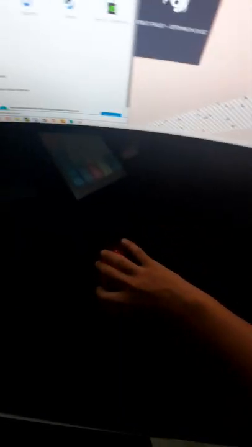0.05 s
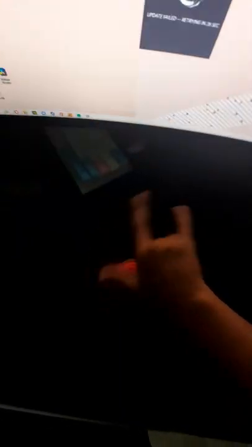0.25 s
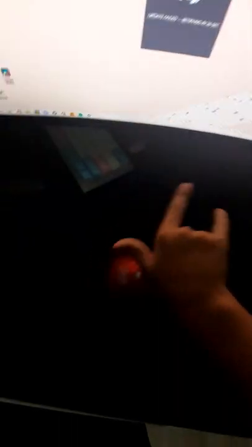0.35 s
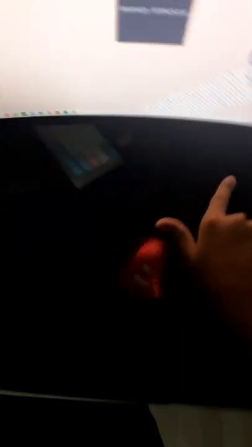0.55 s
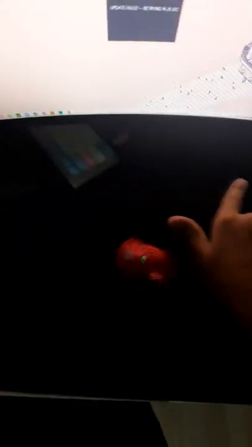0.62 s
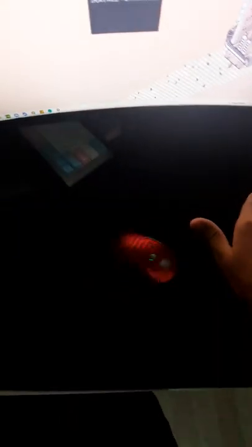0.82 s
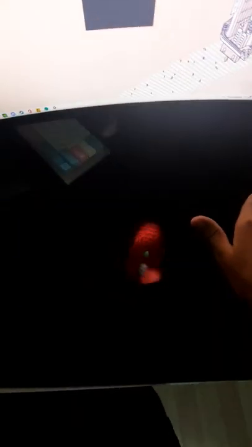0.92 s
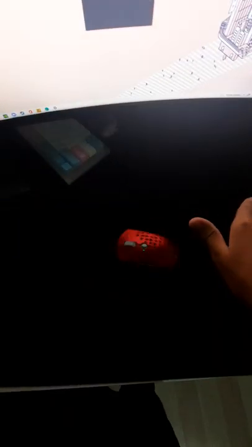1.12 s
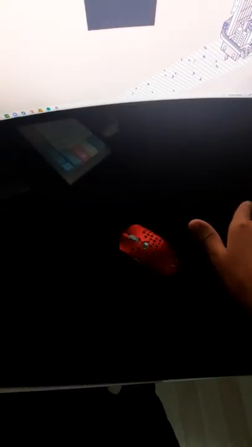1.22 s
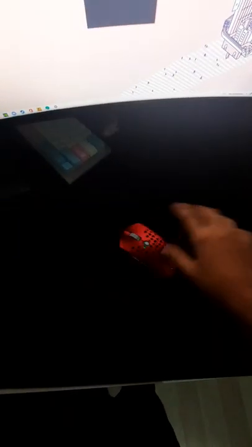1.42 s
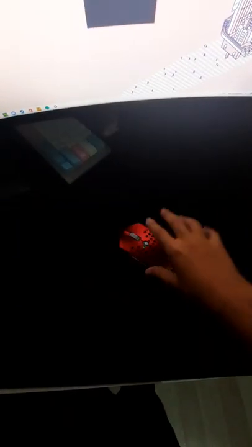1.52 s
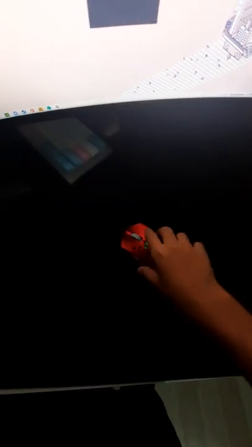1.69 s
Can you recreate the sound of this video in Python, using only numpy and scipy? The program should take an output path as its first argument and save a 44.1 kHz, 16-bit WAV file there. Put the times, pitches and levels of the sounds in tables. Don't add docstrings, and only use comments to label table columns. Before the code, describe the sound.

Computer mouse flicked on a desk: quick double click, one woody knock, small bounce, soft fading spin

```python
import sys
import numpy as np
from scipy import signal
from scipy.fft import rfft, irfft, next_fast_len
from scipy.io import wavfile
from scipy.ndimage import uniform_filter1d, map_coordinates

SR = 44100
rng = np.random.default_rng(int(sys.argv[2]) if len(sys.argv) > 2 else 0)


def level_to_linear(level):
    exponent = np.asarray(level, float) / 20
    return 10 ** exponent


def master_out(mix):
    frames = np.transpose(np.atleast_2d(mix))
    ceiling = np.clip(frames, -1, 1)
    pcm = np.round(ceiling * 32767).astype(np.int16)
    wavfile.write(sys.argv[1], SR, pcm)


N = 77175
TOP_HZ = 15780


def unit(x):
    return x / np.sqrt(np.mean(x ** 2) + 1e-20)


def along(points, hz):
    f, v = np.transpose(points)
    return np.interp(np.log(hz + 1), np.log(f + 1), v)


def curves(rows):
    s, *cols = np.transpose(rows)
    return [np.interp(np.arange(N) / SR, s, c, left=-140, right=-140) for c in cols]


def wobble(rate_hz):
    knots = rng.standard_normal(int(N * rate_hz / SR) + 4)
    return unit(map_coordinates(knots, [np.arange(N) * rate_hz / SR]))


def sides(left_over_right_db):
    return level_to_linear([[left_over_right_db / 2], [-left_over_right_db / 2]])


def filtered(x, response):
    m = next_fast_len(x.shape[-1] + 8192)
    return irfft(rfft(x, m) * response(np.fft.rfftfreq(m, 1 / SR)), m)[..., :x.shape[-1]]


def resonances(peaks):
    def response(f):
        total = 0
        for k, (hz, width_hz, db) in enumerate(peaks):
            damping = 1j * f * width_hz
            total = total + (-1) ** k * level_to_linear(db) * damping / (hz * hz - f * f + damping)
        return total
    return response


def rush(spectrum, alike, patchy_db, source=None):
    if source is None:
        source = rng.standard_normal((2, N))
    z = signal.stft(source, nperseg=512)[2]
    field = rng.standard_normal(z.shape[1:])
    field = uniform_filter1d(uniform_filter1d(field, size=6, axis=0), size=10, axis=1)
    pair = signal.istft(z * level_to_linear(patchy_db * unit(field)), nperseg=512)[1][:, :N]

    def mid_side(hz):
        turn = np.arccos(np.clip(along(alike, hz), -1, 1)) / 2
        return level_to_linear(along(spectrum, hz)) * (hz < TOP_HZ) * [np.cos(turn), np.sin(turn)]

    mid, side = filtered(pair, mid_side)
    return unit(np.array([mid + side, mid - side]))


# (hz, t60_s)
ROOM_DECAY = [(80, 0.42), (300, 0.26), (1000, 0.49), (3000, 0.25), (7000, 0.32), (14000, 0.12)]


def fading(x):
    hz, t, z = signal.stft(x, SR, nperseg=256)
    decay = level_to_linear(-60 * t / along(ROOM_DECAY, hz)[:, None])
    return signal.istft(z * decay, SR, nperseg=256)[1][:, :N]


# (hz, level_db_per_hz)
HUM = [(15, -61.5), (25, -8.5), (96, -6.5), (225, -12), (306, -6.5), (357, -14.5), (450, -4.5), (515, -7.5),
       (2500, -37), (3250, -68), (5500, -120)]
# (hz, width_hz, level_db)
STANDING = [(262, 25, -3.5), (352, 30, 5), (460, 7, 3), (553, 22, -3)]
# (hz, left_right_likeness)
HUM_ALIKE = [(60, 0.19), (240, 0.96), (950, -0.18), (3770, 0.27), (15000, -0.02)]


def fans():
    hum = rush(HUM, HUM_ALIKE, patchy_db=1.8)
    hum = filtered(hum, lambda hz: 1 + abs(resonances(STANDING)(hz)))
    return level_to_linear(-66 + 0.6 * wobble(6)) * unit(hum)


# (hz, level_db_per_hz)
HISS = [(880, -36), (1500, -6.5), (4870, -15), (6060, -16), (9950, -17), (13000, -11), (16000, -12)]


def hiss():
    return level_to_linear(-83) * rush(HISS, [(1000, 0.1)], patchy_db=-0.1)


# (hz, level_db_per_hz)
EARLIER = [(24, -52), (40, -1), (368, -4.5), (490, -7.5), (701, -11), (890, -9), (1270, -13), (2610, -8),
           (3600, -19.5), (6800, -30), (7600, -54.5), (15600, -85), (22000, -120)]
# (hz, left_right_likeness)
TAIL_ALIKE = [(100, 0.89), (300, 0.58), (600, 0.4), (1500, .05)]


def earlier_knock():
    return level_to_linear(-44.5) * fading(rush(EARLIER, TAIL_ALIKE, patchy_db=1.0))


SPIN_ALIKE = [(1000, 0.41)]  # (hz, left_right_likeness), hand and feet
# (start_s, level_db)
HAND = [
    (.125, -93),
    (.145, -67),
    (.16, -62),
    (.19, -63),
    (.21, -54),
    (.225, -56),
    (.24, -72.5),
]
# (hz, level_db_per_hz)
SKIN = [(800, -30.5), (1500, -7), (2800, -2), (3600, -10.5), (6400, -5), (9000, -9), (12600, -3),
        (16000, -8)]


def hand():
    level_db, = curves(HAND)
    return level_to_linear(level_db) * rush(SKIN, SPIN_ALIKE, patchy_db=1.5)


# (start_s, level_db, contact_s)
BLOWS = [(0.153, -53.5, 0.0027), (0.173, -54, 0.00067), (0.2358, -21.5, 0.0012), (0.307, -38.5, 0.0015),
         (.392, -50, 0.0021), (.478, -53.5, 0.0052), (.52, -62.5, 0.0014), (0.642, -63.5, 0.0032),
         (0.733, -65.5, 0.0066), (.91, -60.5, 0.0037), (1.009, -70, 0.0041), (1.262, -71, 0.0067)]
# (hz, level_db, t60_s, left_over_right_db, left_lead_ms)
DESK = [(54.5, -24.5, 0.61, -3.5, 0), (102.45, -3.5, 0.4, 2, 0.069), (130.9, 1.5, 0.48, 2, 0),
        (169.7, -4.5, .8, 2, 0.63), (260.9, -7.5, 0.91, 0, -0.22), (280.7, -10, 0.64, 3, -.1),
        (317.2, -15.5, 1, -6.5, -1.1), (340.4, -10.5, 0.4, -0.5, 0.44), (379, 3.5, 0.07, 4, .05),
        (399.3, -7.5, 0.37, 3.5, -0.25), (434.6, -4, 0.21, 2, .1), (487.5, -2, .18, -1, 0.25),
        (612.7, -16, 0.14, 6, 0.19), (694.2, -7.5, 0.058, -7.5, 0.065)]
SWING = [1, 1, 1, -1, 1, 1, -1, -1, -1, -1, -1, -1, 1, -1]


def desk():
    settle_db_per_s3, build_cycles = 2493.5, 0.88
    t, push, ring = np.arange(N) / SR, np.zeros(N), np.zeros((2, N))
    for start_s, level_db, contact_s in BLOWS:
        u = np.clip((t - start_s) / contact_s, 0, 1)
        push += level_to_linear(level_db) * np.sin(np.pi * u) ** 2 / (contact_s * SR / 2)
    for swing, (hz, level_db, t60_s, left_over_right_db, lead_ms) in zip(SWING, DESK):
        envelope = level_to_linear(level_db - 60 * t / t60_s - settle_db_per_s3 * t ** 3)
        envelope = envelope * (1 - np.exp(-t * hz / build_cycles))
        port_t = t + lead_ms * np.array([[0.5], [-0.5]]) / 1000
        ring += swing * envelope * np.sin(2 * np.pi * hz * port_t) * sides(left_over_right_db)
    return signal.fftconvolve(push[None], ring, axes=1)[:, :N]


SNAP_S = [
    .1952,
    .2024,
    .2363,
    .3062,
]
# (level_db, length_s, mix: button 0 to body 1, left_over_right_db, trend_db_per_s)
SNAPS = [
    (-37.5, 0.0012, 0.02, -6.5, -900),
    (-32.5, 0.0024, .04, -2, -900),
    (-30, 0.0034, 0.94, 0.5, 298),
    (-47.5, .001, 1, 4, -900),
]
# (hz, width_hz, level_db)
BUTTON = [(1670, 180, -14), (4194, 470, -14.5), (5950, 500, -12), (7350, 300, -3.5), (8660, 860, -13.5),
          (11600, 250, 7), (13700, 400, 0), (14900, 1500, -0.5)]
# (hz, width_hz, level_db)
BODY = [(990, 260, -0.5), (1940, 300, -6.5), (3000, 1500, -5), (4464, 500, 1), (5670, 440, -4),
        (6230, 400, -1.5), (7700, 770, 1), (10200, 1100, -4), (11700, 900, -1.5), (14200, 1500, -2.5)]


def snaps(times_s, rows):
    snap_t60_s, port_top_hz, port_fall = 0.011, 15600, 40
    t, out = np.arange(N) / SR, np.zeros((2, N))
    for start_s, (level_db, length_s, mix, left_over_right_db, trend_db_per_s) in zip(times_s, rows):
        since = t - start_s
        trend_db = trend_db_per_s * np.clip(since, 0, length_s)
        decay_db = 60 * np.maximum(since - length_s, 0) / snap_t60_s
        shape = (since > 0) * level_to_linear(level_db + trend_db - decay_db)
        burst = shape * rng.standard_normal((2, N)) * sides(left_over_right_db)
        for peaks, share in ((BUTTON, 1 - mix), (BODY, mix)):
            out += np.clip(share, 0, 1) * 2 * filtered(burst, resonances(peaks))
    return filtered(out, lambda hz: 1 / (1 + (hz / port_top_hz) ** port_fall))


# (start_s, pitch_hz, level_db, t60_s, left_over_right_db)
PINGS = [
    (.1955, 1668, -60, .04, 11),
    (.2032, 1668, -50, .04, 11),
    (.2375, 1680, -46, .04, 9),
    (.2366, 2385, -32, .035, -3),
    (.2364, 5060, -38, .018, 0),
    (.2440, 2750, -42, .03, 5),
]


def ping():
    rise_cycles, out = 3, np.zeros((2, N))
    for start_s, pitch_hz, level_db, t60_s, left_over_right_db in PINGS:
        t = np.maximum(np.arange(N) / SR - start_s, 0)
        envelope = level_to_linear(level_db - 60 * t / t60_s) * (1 - np.exp(-t * pitch_hz / rise_cycles))
        out += envelope * np.sin(2 * np.pi * pitch_hz * t) * sides(left_over_right_db)
    return out


# (start_s, level_db, mix: button 0 to body 1, left_over_right_db)
RATTLES = [
    (.2108, -53, .1, 0),
    (.2150, -59, 0.79, -2.5),
    (0.22, -50.5, .6, -4.5),
    (0.2441, -48, 0.83, -0.5),
    (0.2455, -46, .6, 6),
    (.2515, -54, .5, -5.5),
]


def rattles():
    rows = [(level_db, 0.00085, mix, pan_db, 0) for _, level_db, mix, pan_db in RATTLES]
    return snaps([row[0] for row in RATTLES], rows)


# (hz, level_db_per_hz)
SLAP = [(400, -14), (750, -1.5), (1300, -6), (2200, -0.5), (4000, -6), (7000, -20), (12000, -12),
        (16000, -18)]


def slap():
    pulse = level_to_linear(-5) * (np.arange(N) == round(0.2364 * SR))
    return filtered(pulse, lambda hz: level_to_linear(along(SLAP, hz)))


def room(x):
    wall_s = 0.006
    tail = fading(rush([(100, 0)], TAIL_ALIKE, patchy_db=1.5))
    delayed = np.pad(x, (round(wall_s * SR), 0))
    return signal.fftconvolve(delayed[None], tail / np.linalg.norm(tail[0]), axes=1)[:, :N]


def fibres():
    plucks_per_s, spread_db = 14000, 1.2
    hits = rng.random((2, N)) < plucks_per_s / SR
    return hits * rng.standard_normal((2, N)) * level_to_linear(spread_db * rng.exponential(size=(2, N)))


# (start_s, level_db, dull_drag_db)
SPIN = [(.24, -66.5, -6), (.3, -63.5, 1), (.345, -64, 2.5), (.38, -63.5, -5), (.405, -67.5, 0),
        (.425, -64.5, 1), (.445, -72, 2), (.46, -75.5, -2), (.495, -72.5, -3), (.52, -69, -5),
        (.56, -68.5, -3.5), (.63, -74.5, -4), (.7, -73, -1.5), (.745, -79.5, -3), (.78, -72, -15),
        (.88, -72, -8.5), (.96, -75.5, -8), (1.0, -75, -8.5), (1.1, -84.5, -4), (1.2, -89.5, 0),
        (1.35, -100, -5.5)]
# (hz, level_db_per_hz)
FIZZ = [(5000, -31.5), (8000, -7), (10000, -4), (12000, 1.5), (14000, -3), (16000, -6.5)]
# (hz, level_db_per_hz)
DRAG = [(1500, -12.5), (4000, -7), (6200, 0.5), (7000, -2.5), (8300, 0.5), (10000, -13.5), (14000, -34)]
# (hz, level_db_per_hz)
RUMBLE = [(60, -28), (110, -9), (170, 1), (220, -7.5), (300, -2.5), (550, -2), (1200, -16), (3000, -45.5)]


def spin():
    level_db, drag_db = curves(SPIN)
    fizz = rush(FIZZ, SPIN_ALIKE, patchy_db=1.5, source=fibres())
    drag = level_to_linear(-1.5 + drag_db) * rush(DRAG, SPIN_ALIKE, patchy_db=1.5, source=fibres())
    rumble_db = -73.5 + 0.096 * (level_db + 70.5)
    rumble = level_to_linear(rumble_db) * rush(RUMBLE, TAIL_ALIKE, patchy_db=3.0)
    return level_to_linear(level_db + 1.2 * wobble(59)) * (fizz + drag) + rumble


def drone():
    pitch_hz, level_db, start_s, end_s = 98.2, -71.5, 0.93, 1.47
    t = np.arange(N) / SR
    swell = np.sin(np.pi * np.clip((t - start_s) / (end_s - start_s), 0, 1)) ** 0.5
    tone = np.sin(2 * np.pi * pitch_hz * t + 0.36 * wobble(11.0))
    return level_to_linear(level_db + 2.3 * wobble(9.7)) * swell * tone


def scene():
    walls_from_hz, desk_room_db, snap_room_db = 340, -6, -25
    background = fans() + hiss() + earlier_knock() + drone()
    wood, shell = desk(), snaps(SNAP_S, SNAPS)
    upper = filtered(wood[0], lambda hz: (1j * hz / (walls_from_hz + 1j * hz)) ** 2)
    walls = room(level_to_linear(desk_room_db) * upper + level_to_linear(snap_room_db) * shell[0] + slap())
    return background + hand() + wood + shell + ping() + rattles() + walls + spin()


def band_limit(x):
    return signal.sosfilt(signal.butter(12, 16640, fs=SR, output="sos"), x)


def record(dry):
    low_cut_hz, port_lag_s = 18, 0.0001

    def ports(hz):
        lag = np.exp(1j * np.pi * hz * port_lag_s * np.array([[1], [-1]]))
        return (1j * hz / (low_cut_hz + 1j * hz)) ** 2 * lag

    mix = filtered(dry, ports)
    return band_limit(mix)


dry = scene()
out = record(dry)
master_out(out)
```